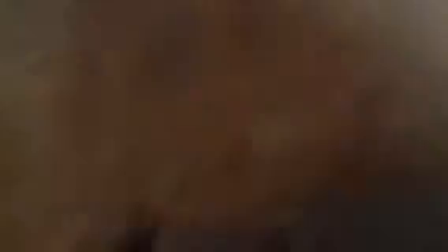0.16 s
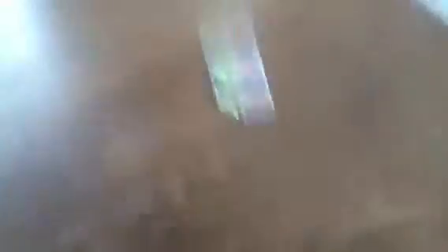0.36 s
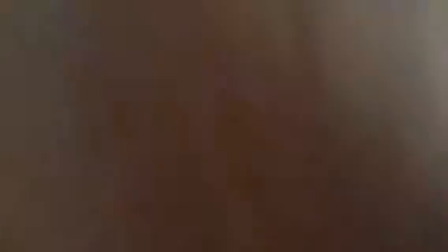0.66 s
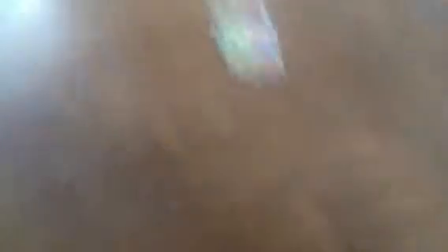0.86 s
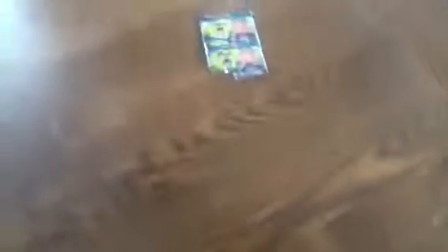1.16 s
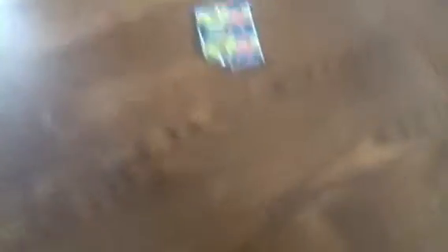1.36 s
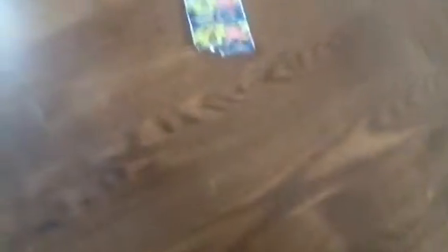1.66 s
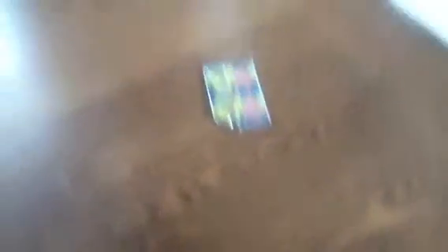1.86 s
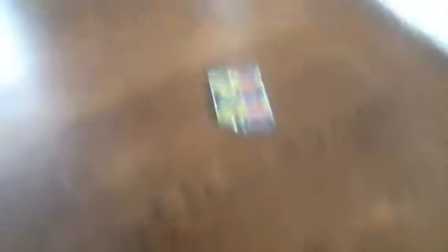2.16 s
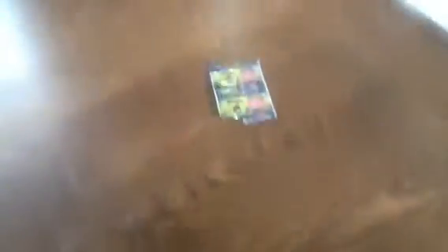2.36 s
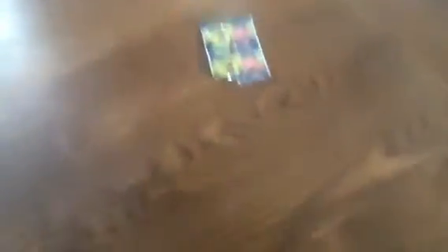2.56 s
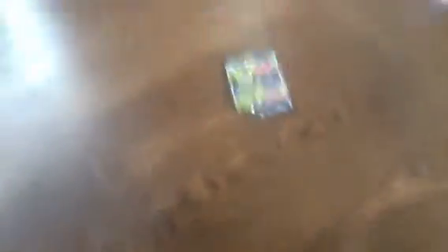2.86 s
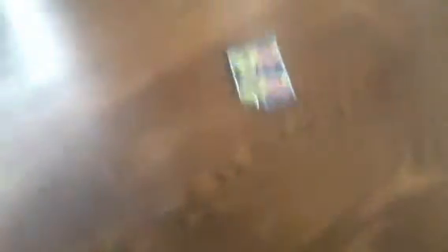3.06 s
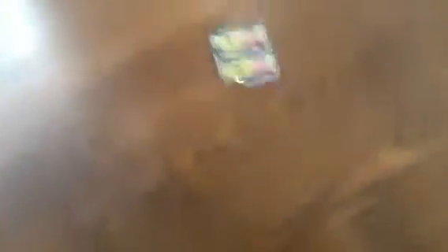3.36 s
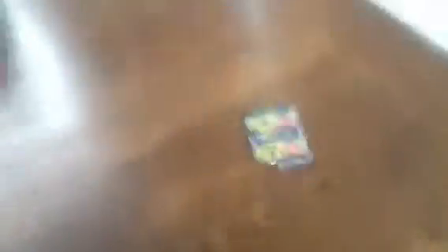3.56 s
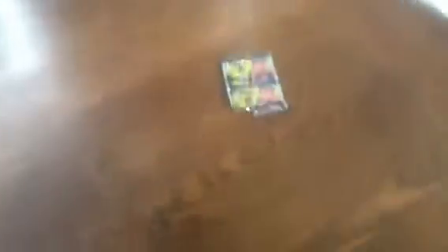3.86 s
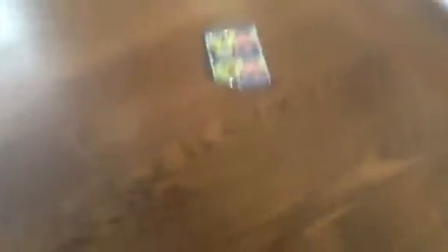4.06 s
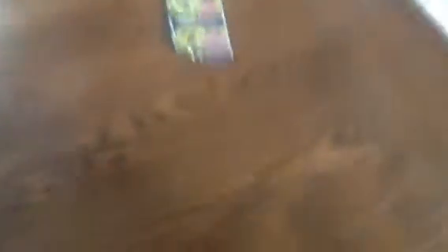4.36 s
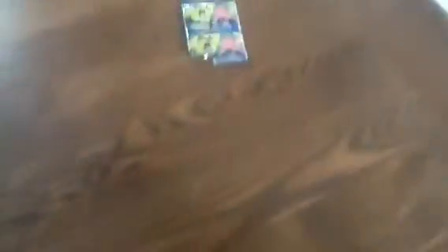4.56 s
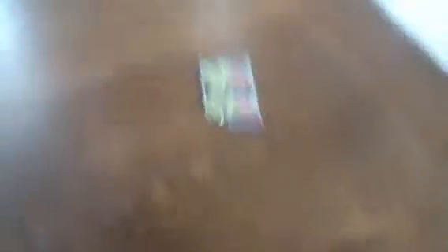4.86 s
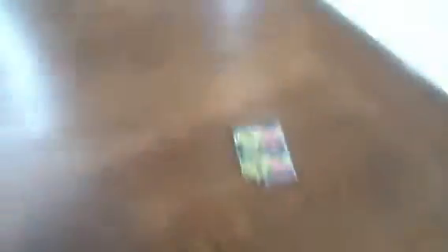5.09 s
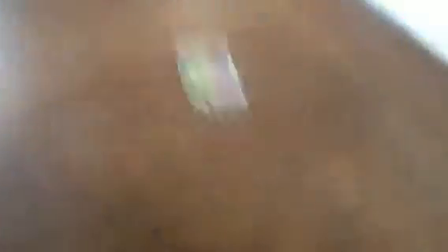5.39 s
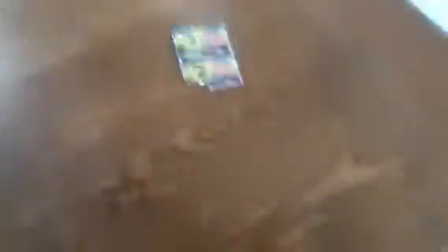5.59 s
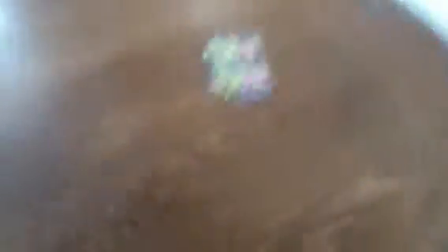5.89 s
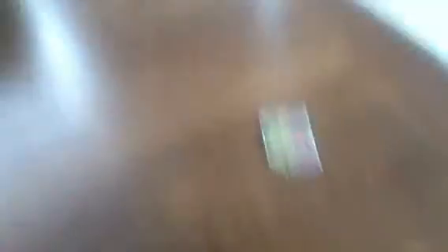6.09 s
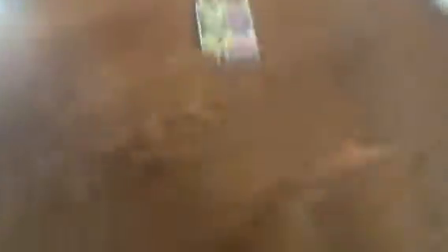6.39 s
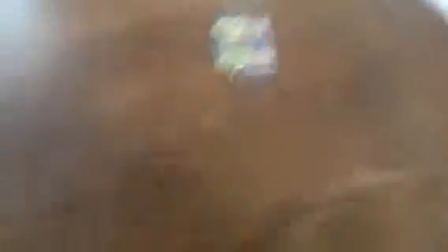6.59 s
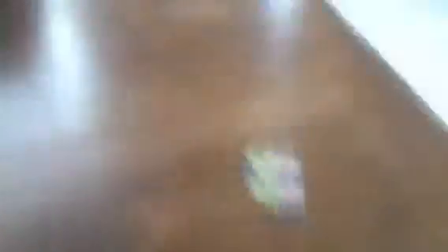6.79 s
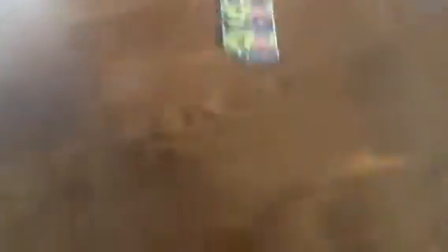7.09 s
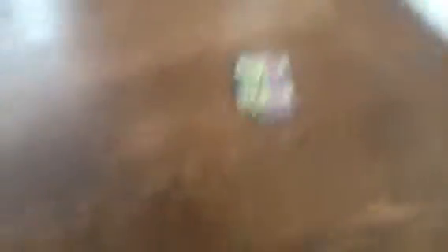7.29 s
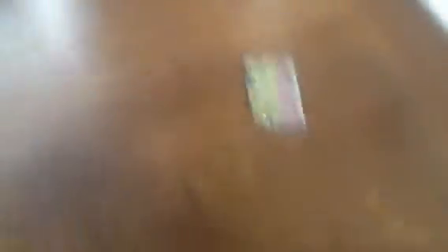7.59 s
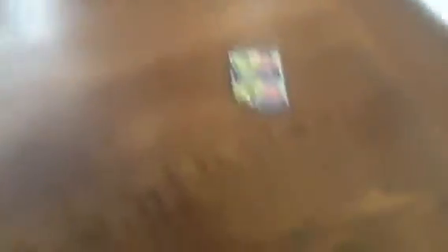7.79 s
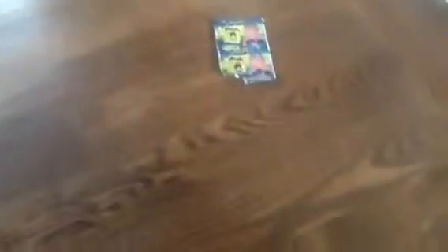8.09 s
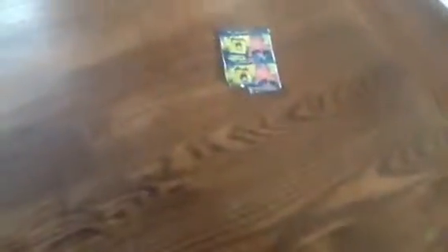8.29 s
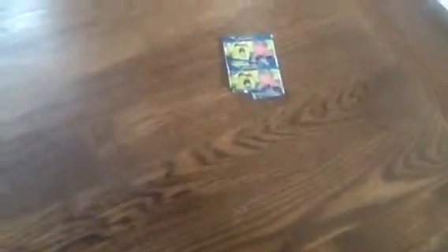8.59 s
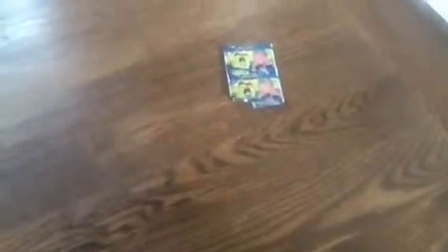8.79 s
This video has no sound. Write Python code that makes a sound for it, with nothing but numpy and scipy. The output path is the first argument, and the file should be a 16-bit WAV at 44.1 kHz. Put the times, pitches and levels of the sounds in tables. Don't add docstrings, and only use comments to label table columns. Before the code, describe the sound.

Fingers and palm work on a camera's plastic casing, heard right at its built-in microphone. Loud clustered knocks and gritty rubbing fill the first second, then irregular thumps, snaps and ticks come in bursts with quieter gaps. A heavy thud lands just after six seconds and a dense flurry near seven, then only faint ticks and soft rubbing over thin hiss. Dry, close, no room sound.

```python
import sys
import numpy as np
from scipy import signal
from scipy.fft import rfft, irfft
from scipy.io import wavfile

SR = 44100
rng = np.random.default_rng(int(sys.argv[2]) if len(sys.argv) > 2 else 0)


def master_out(mix):
    frames = np.transpose(np.atleast_2d(mix))
    ceiling = np.clip(frames, -1, 1)
    pcm = np.round(ceiling * 32767).astype(np.int16)
    wavfile.write(sys.argv[1], SR, pcm)


def convert_level_to_amplitude(level_db):
    exponent = np.asarray(level_db, float) / 20
    return 10 ** exponent


N = 394254

# freq_hz, density_db
HISS_SPECTRUM = [(100, 2), (800, -0.5), (2000, 1.2), (4000, 0), (9000, -0.8), (14400, -1.5)]
# start_s, duck_db
DUCKS = [
    (0.0, -3),
    (.23, -5.5),
    (.99, -4.5),
    (2.753, -3),
    (4.476, -5.5),
    (6.146, -8),
]
# time_s, rumble_db, grit_re_rumble_db
GRIP = [(0.05, -50.5, -15), (.28, -68.5, -6.5), (.4, -53.5, -25.5), (.85, -48, -22.5), (1.24, -60, -18),
        (2.1, -59.5, -13.5), (2.8, -61, -12), (2.94, -77, 0), (3.18, -80.5, 8), (3.24, -62.5, -6),
        (3.58, -70, -13), (3.9, -56, -11), (4.65, -60, -20), (5.6, -58.5, -11.5), (6.5, -58, -17),
        (7.8, -60.5, -13.5), (8.28, -60.5, -19), (8.94, -57, -16)]
# peak_s, rumble_db, swell_s, grit_re_rumble_db
SWELLS = [(0.215, -34, 0.06, -5.5), (0.315, -39.5, .04, -6), (0.609, -36, 0.06, -7.5),
          (0.985, -27, 0.05, -2), (1.7, -44.5, 0.44, -16), (2.02, -43, .06, -20), (2.31, -32.5, .11, -8.5),
          (2.41, -38, 0.04, -14), (2.535, -28.5, 0.1038, -8), (2.75, -35, 0.01, -15), (2.855, -42, 0.1, -5),
          (3.008, -39.5, 0.0836, -2.5), (3.295, -42.5, .075, -11.5), (3.472, -36, 0.08, -11),
          (3.66, -43, .1, -13.5), (4.375, -32.5, 0.1326, -10.5), (4.775, -43.5, 0.12, -11),
          (5.03, -40, 0.12, -16), (5.28, -44, 0.15, -13.5), (5.52, -33, 0.12, -16.5), (5.8, -46.5, 0, -19),
          (5.98, -40.5, 0.11, -12.5), (6.14, -42, 0.04, -19), (6.21, -48.5, 0.13, -13),
          (6.38, -39.5, 0.1, -12.5), (6.862, -28, 0.0578, -3), (7.045, -42, 0.18, -15),
          (7.35, -48, 0.27, -16), (7.48, -38, 0.05, -16.5), (7.61, -41.5, 0.1, -16.5),
          (0.69, -50.5, .1, -9), (0.8, -55, .1, -14), (1.45, -55, 0.13, -12), (2.66, -38.5, 0.2, -11.5),
          (3.23, -52, 0.039, 1.5), (3.9, -53.5, .12, -6.5), (4.205, -54.5, 0.073, -1),
          (4.35, -48.5, .04, -2), (6.07, -55, 0.14, -5.5), (6.125, -53, 0.04, -2.5), (6.58, -54, .08, -12),
          (6.87, -37.5, 0.22, -16), (7.03, -50, 0.036, -3), (7.86, -52.5, 0.093, -6.5),
          (8.0, -66.5, 0.28, -1)]
# start_s, step_db, rise_ms
PUSHES = [(0.2332, -24.0, 0.08), (0.2335, -21, 0.018), (0.2364, -13.5, 0.16), (0.5127, -0.5, 0.031),
          (0.5174, -33, 0.025), (0.5299, 2.6, 0.092), (0.5646, -15.5, 0.061), (0.5949, -15, 0.066),
          (0.6003, -7, 0.011), (0.6078, -7.5, 0.035), (1.1878, -17.5, 0.012), (1.2698, -11.5, 0.023),
          (2.2693, -16.1, 0.08), (2.5161, -12, 0.21), (2.5427, -16.5, 0.015), (2.7215, -24.3, 0.025),
          (2.7525, -0.5, 0.049), (2.7631, -14, 0.045), (3.0136, -24, 0.11), (4.0393, -15.5, 0.011),
          (4.391, 1, 0.067), (5.1057, -14, 0.08), (5.5315, -14.9, 0.08), (5.6578, -8, 0.032),
          (5.711, -11.5, 0.022), (5.8068, -14.5, 0.038), (6.1455, -1, 0.045), (6.8535, -17, 0.041),
          (6.8571, -18.5, 0.08), (6.8575, -20, 0.012), (8.7193, -35.5, 0.097)]
# start_s, step_db, rise_ms
PULLS = [(0.1515, -4.5, 0.028), (0.2265, -19.4, 0.16), (0.2283, -9, 0.045), (0.2286, -8.5, 0.0069),
         (0.5124, -5, 0.039), (0.6204, -27.5, 0.13), (0.969, -7.5, 0.058), (0.9733, -8, 0.012),
         (0.9801, -5, 0.05), (0.9811, -17, 0.045), (0.9891, -5, 0.018), (0.9983, -26, 0.045),
         (1.0339, -4.5, 0.1), (1.6238, -12.5, 0.016), (1.7219, -3.5, 0.027), (1.7237, -21.5, 0.012),
         (2.3105, -8.5, 0.012), (2.5252, -16, 0.017), (2.738, -1.5, 0.035), (2.7431, -8.5, 0.068),
         (4.0417, -32, 0.069), (4.4028, -5.5, 0.066), (4.4953, -17, 0.12), (5.0507, -10, 0.076),
         (5.0823, -2.5, 0.11), (5.1165, -9.5, 0.032), (5.5048, -3.5, 0.14), (5.5433, -6.5, 0.055),
         (5.7124, -28, 0.023), (6.1424, -27.5, 0.08), (6.4122, -9, 0.022), (6.8578, -23, 0.13)]
# start_s, step_db, softness_ms
SQUEEZES = [(0.1103, -7, 1), (0.112, -19, 0.18), (0.2154, -9, 0.18), (0.2159, 5, 0.35), (0.2168, -4, 0.16),
            (0.2347, -7, 0.15), (0.2351, 6, 0.5), (0.2383, -13, 0.12), (0.5272, -10, 0.88),
            (0.5922, -2, 0.62), (0.6094, -9, 0.8), (0.6179, -12.9, 0.33), (0.6219, -6, 0.52),
            (0.8239, -7, 1), (0.9474, -6, 0.32), (0.9654, -6.0, 0.29), (0.9856, -2, 0.32),
            (0.9933, 0, 0.66), (1.0024, 3, 0.63), (2.03, -6, 1), (2.0349, 3, 0.81), (2.0393, -9, 1),
            (2.2978, -1.5, 0.73), (2.3128, -11.5, 0.28), (2.3191, -3.8, 0.56), (2.3305, 1, 0.93),
            (2.5283, -3, 0.51), (2.5544, -3.5, 0.43), (2.6913, -10, 0.87), (2.7348, -1, 0.9),
            (3.0167, -12, 1), (3.4539, -12, 0.85), (3.4622, -13.5, 0.29), (3.466, -12, 0.58),
            (3.4707, -10, 0.39), (3.4781, -18, 0.32), (3.4899, -14, 0.64), (4.0388, -25, 0.14),
            (4.3546, 1.5, 0.88), (4.374, -3, 0.84), (4.4179, -4, 0.68), (5.4664, -7, 1), (5.5053, -5, 0.43),
            (5.7106, -17, 0.19), (6.1449, -22, 0.15), (6.3926, -14, 0.57), (6.4126, -16, 0.53),
            (6.8407, -4.0, 0.52), (6.8473, 11, 0.96), (6.8611, -7.5, 0.13), (6.8649, -16, 0.15),
            (6.8702, 11.4, 0.95), (6.8735, -9, 0.22), (6.8877, -9, 0.22), (6.8989, -6.6, 0.6),
            (7.4882, -14.3, 0.45)]
# start_s, step_db, softness_ms
RELEASES = [(0.1123, -4, 0.6), (0.1511, -4, 0.48), (0.2196, -3, 1), (0.2227, 0, 0.5), (0.228, 3, 0.14),
            (0.2302, -10, 0.15), (0.4715, -3.5, 0.46), (0.5152, -15, 0.18), (0.5162, 8.3, 0.97),
            (0.6306, -0.2, 1), (0.8518, -15, 0.33), (0.9364, -8.5, 0.17), (0.9565, 1.0, 1),
            (0.9719, -14, 0.22), (0.9747, -5, 0.24), (1.1243, -17, 1), (1.6875, -19.5, 0.25),
            (2.344, -10, 0.34), (2.3476, -12, 0.36), (2.4841, -9, 1), (2.5002, -8.3, 0.6),
            (2.5206, -3.5, 0.33), (2.5372, -1, 0.78), (2.5433, -16, 0.15), (2.5465, -15, 0.19),
            (2.5611, -7, 0.3), (2.7528, 2, 0.83), (2.8475, -8, 0.74), (3.0025, -15, 0.29),
            (3.0078, -11, 0.63), (3.0387, -23, 0.25), (3.5005, -12, 0.97), (4.3469, -14, 0.39),
            (4.4758, -5, 0.71), (4.7849, -24, 0.12), (5.476, -7.5, 0.82), (5.5114, -1.6, 0.9),
            (5.5406, -2, 1), (5.9648, -12.5, 0.47), (5.9752, -19, 0.5), (6.1243, -13, 1),
            (6.3671, -10, 0.76), (6.8347, -10.5, 0.64), (6.8494, 7.5, 0.94), (6.8497, -8, 0.22),
            (6.8557, -1.5, 0.28), (6.862, -6.5, 0.2), (6.8659, -8.8, 0.17), (6.8674, 10, 1),
            (6.8694, -2, 0.15), (6.8698, -10.9, 0.12), (6.8747, -7.1, 0.13), (6.8811, -0.5, 0.42),
            (6.9077, -7, 0.84), (7.0348, -18, 0.45), (7.4602, -9, 0.88), (7.836, -14.5, 0.67)]
# start_s,
# step_db, rise_ms
THUDS_UP = [(3.0035, -27, 0.15), (3.0859, -31, 0.2), (3.5042, -19, 1.0), (4.289, -27, 0.84),
            (4.8023, -30.5, 0.55), (4.9452, -31.5, 1.0), (5.2311, -23, 0.47), (5.978, -20, 1),
            (6.6154, -37, 0.35), (6.7382, -33.7, 0.35), (6.7587, -28.5, 0.073), (7.5203, -29, 0.14),
            (8.466, -31.5, 1), (8.6083, -36, 0.98),
            (0.6058, -12, 0.8), (0.6272, -18.3, 1), (0.9829, -11, 0.22), (1.1877, -17, 0.3),
             (1.7225, -21, 0.04), (2.2554, -17, 1), (2.3016, -9, 0.2), (2.31, -19, 0.22),
             (2.6133, 4.5, 0.31), (2.6934, -18.6, 0.22), (2.7525, -20, 0.24), (3.0152, -22, 0.2),
             (3.47, -24, 0.96), (4.4247, 0, 0.59), (4.4753, 9.5, 0.64), (4.803, -24.5, 0.7),
             (5.5073, -22.6, 0.4), (5.656, -21, 0.63), (6.1228, -27, 0.2), (6.1468, -19.5, 0.22),
             (6.8543, -0.5, 0.84), (6.8583, -15, 0.4), (6.8636, -1.0, 1), (6.8716, -18, 0.26)]
# start_s, step_db, rise_ms
THUDS_DOWN = [(0.1129, -13, 0.16), (0.2105, -6.5, 1), (0.2178, -3, 0.23), (0.2197, -6, 0.75),
              (0.2269, 2.2, 0.63), (0.3202, -6, 0.44), (0.516, 6.5, 0.97), (0.5894, -4, 0.5),
              (0.5996, 6, 0.7), (0.9829, 1, 1), (0.993, -10, 0.22), (0.9958, -13, 0.22),
              (1.0154, -1.3, 0.42), (0.5868, -7, 1), (1.6235, -17, 0.56), (1.7218, -19, 0.25),
              (2.3082, -10, 0.18), (2.535, -13, 1), (2.5456, 8.5, 0.63), (2.6937, 3, 0.93),
              (2.7387, -2.5, 1), (2.742, -10, 0.7), (2.749, -6.5, 0.59), (2.7637, -0.7, 1),
              (2.8348, -15, 1), (2.8937, -26, 0.37), (3.4765, -28, 0.22), (3.4836, -15, 1),
              (4.4743, -18, 0.26), (5.6652, -7.5, 0.97), (6.1458, -5, 1), (6.4119, -26, 1),
              (6.5756, -11.7, 1), (7.4604, -6.2, 1), (7.49, -2.4, 1), (7.4932, -9, 1),
              (0.1842, -25, .15), (0.2954, -22, .6), (0.706, -21.5, 1.0), (1.9884, -26, 0.87),
          (2.4524, -24, 1.0), (3.8377, -25, 1.0), (4.2104, -33, 1.0), (4.5992, -31, .6), (5.169, -27.5, .8),
          (5.1783, -29, .8), (5.3915, -27.5, 0.63), (5.6087, -36.7, .2), (6.759, -29, 0.42),
          (7.028, -27, .2), (8.305, -44, .15), (8.527, -37, 0.41)]
# start_s, step_db
SNAPS_UP = [(0.9456, -23.5), (1.0295, -19), (1.18752, -19.5), (1.5339, -23), (1.6581, -23.5), (1.7512, -24),
            (2.4938, -18), (2.5032, -18), (2.5753, -27), (2.5954, -18), (2.6562, -19), (2.7038, -20.5),
            (2.7891, -18.5), (2.8344, -28), (2.8361, -22), (2.8433, -18), (2.8878, -20.5), (2.897, -26),
            (3.0389, -20), (3.2825, -24.5), (3.4938, -23), (4.3993, -18.5), (4.7835, -18.5),
            (5.0133, -19.5), (5.3339, -24.5), (6.1222, -19.5), (6.8257, -20), (6.8339, -13.5),
            (7.4525, -16.5), (7.5754, -23),
            (0.533, -33.4), (0.9375, -28), (1.0992, -29), (2.3199, -25), (2.7688, -39), (2.8397, -29.5),
             (2.8956, -32), (2.3176, -29), (2.5161, -21.5), (2.9559, -37.5), (4.347, -33.9),
             (4.3492, -34.0), (4.411, -35.0), (4.4196, -32), (5.0798, -31.5), (6.8574, -26.3)]
# start_s, step_db
SNAPS_DOWN = [(0.2174, -18), (0.2384, -17), (0.3177, -17), (0.3266, -25), (0.6368, -17), (0.6866, -22.5),
              (0.7026, -31.5), (1.009, -17.5), (1.071, -21.5), (1.1003, -27), (1.4, -27.5), (1.4424, -23),
              (1.467, -17), (1.808, -25), (2.129, -29), (2.257, -15.5), (2.286, -11), (2.301, -11.5),
              (2.358, -28.5), (2.5075, -15), (3.0861, -28.5), (4.3852, -24), (4.5727, -32), (5.5277, -17),
              (5.5887, -25), (7.3656, -19), (7.5707, -27), (7.6102, -18.5), (8.7714, -23.5),
              (0.472, -29), (0.59953, -7), (0.9934, -17), (4.1863, -38), (0.5114, -38.2), (0.5158, -7.5),
               (0.58932, -19), (0.5983, -31.8), (0.9589, -29.0), (0.9754, -23), (0.9827, -9),
               (1.0171, -32.4), (2.3451, -35.3), (2.5234, -33.1), (2.5274, -30.7), (2.5542, -27),
               (2.5822, -32.0), (2.6315, -37.5), (2.7554, -35), (2.8736, -35.7), (3.3263, -34.9),
               (4.0417, -36), (5.0324, -41), (6.4154, -34), (6.7592, -42)]
# start_s, step_db
TICKS = [(1.1128, -40), (2.4524, -36), (3.2246, -34), (1.7528, -30), (2.6433, -26), (2.7216, -31),
         (2.9681, -29), (3.0326, -32), (3.334, -30), (3.5954, -34), (3.8675, -28), (3.972, -29.5),
         (4.0717, -28), (4.1897, -31.5), (4.2244, -31.5), (4.264, -26), (4.559, -27.5), (4.8239, -34.5),
         (5.561, -28), (5.9745, -31), (5.9898, -27.5), (6.0287, -33.5), (6.1793, -30), (6.2069, -27),
         (6.7063, -27.5), (6.78, -32), (6.7969, -26), (6.806, -25.5), (7.0471, -32.5), (7.6197, -32)]
FAINT_TICKS = [0.8794, 1.5296, 1.6519, 1.6705, 1.6725, 2.6315, 2.8128, 2.8736, 2.8838, 2.9557, 3.3108,
               3.327, 3.3448, 3.4593, 3.9016, 4.0944, 4.198, 4.507, 4.88, 4.9948, 5.3106, 5.4707, 5.8478,
               6.3677, 6.391, 6.566, 7.0715, 7.0969, 7.5129]
FAINTEST_TICKS = [1.553, 1.5922, 2.345, 2.39, 2.555, 2.582, 2.8274, 2.8633, 2.9597, 3.0742, 3.5468, 5.033,
                  6.054, 6.216, 6.2484, 6.659, 6.7298, 6.7492, 6.933, 6.1919, 7.132, 7.1783, 7.3083, 7.4741,
                  7.8804, 8.473, 8.867]
# time_s, level_db
SCRAPE = [
    (.155, -71.5),
    (.2, -57),
    (.225, -58),
    (.24, -46),
    (.262, -58),
    (.285, -60),
    (.295, -70),
]
# start_s, level_db
SNICKS = [(0.2361, -22), (0.2385, -11), (0.242, -18), (0.2446, -21), (0.2522, -23), (0.2573, -22.5),
          (0.2678, -31), (0.2709, -30), (0.2749, -24), (2.988, -26), (4.1632, -40), (4.199, -36)]
# start_s, level_db
TAP = (2.988, -18.5)
# freq_hz, level_db, t60_s
CASING_MODES = [(287, -7.5, 0.066), (750, -5.5, 0.025), (1420, 2, 0.016), (2180, -7.5, 0.013),
                (2620, -12, 0.01), (3500, -9, 0.0088), (5300, -20, 0.005)]


def add(mix, start_s, sound):
    part = mix[round(start_s * SR):][:len(sound)]
    part += sound[:len(part)]


def smooth(x, time_ms):
    pole = np.exp(-1000 / (SR * max(time_ms, .003)))
    return signal.lfilter([1 - pole], [1, -pole], x)


def low_cut(x):
    coupling_hz, wind_hz = 110, 157
    coupling = signal.butter(1, coupling_hz, "high", fs=SR, output="sos")
    wind = signal.butter(4, wind_hz, "high", fs=SR, output="sos")
    return signal.sosfilt(np.vstack([coupling, wind]), x)


def limiter_db():
    recover_s = 0.49
    t = np.arange(N) / SR
    return sum(duck_db * (t >= s) * np.exp(-abs(t - s) / recover_s) for s, duck_db in DUCKS)


def hiss():
    level_db = -67.5
    hz = np.fft.rfftfreq(N, 1 / SR)
    curve_hz, curve_db = np.transpose(HISS_SPECTRUM)
    density_db = np.interp(np.log(hz + 1), np.log(curve_hz), curve_db)
    noise = irfft(rfft(rng.standard_normal(N)) * convert_level_to_amplitude(density_db), N)
    return noise / noise.std() * convert_level_to_amplitude(level_db + limiter_db())


def heard_rms(slope, lo_hz, hi_hz):
    band = signal.butter(2, [lo_hz, hi_hz], "band", fs=SR, output="sos")
    return np.std(signal.sosfilt(band, low_cut(np.cumsum(slope))))


def grains(per_s, spread_db, rise_ms):
    when, sign, size = rng.random((N, 3)).T
    size_db = spread_db * np.minimum(-np.log(size + 1e-9), 4)
    impulses = (when < per_s / SR) * np.sign(sign - .5) * convert_level_to_amplitude(size_db)
    return smooth(impulses, rise_ms)


def effort():
    swell_db, fade_slower, grit_steeper, roundness, crest_db = 22.5, 1.13, 1.175, 1.24, -1.7
    t = np.arange(0, N, 64) / SR
    s, hold_db, hold_grit_db = np.transpose(GRIP)
    peak_s, top_db, swell_s, grit_db = np.transpose(SWELLS)[:, :, None]
    away_s = np.maximum(peak_s - t, (t - peak_s) / fade_slower)
    under_db = swell_db * (away_s / swell_s) ** roundness - crest_db
    rumble_power = convert_level_to_amplitude(2 * np.interp(t, s, hold_db))
    rumble_power = rumble_power + convert_level_to_amplitude(2 * (top_db - under_db)).sum(0)
    grit_power = convert_level_to_amplitude(2 * np.interp(t, s, hold_db + hold_grit_db))
    grit_power = grit_power + convert_level_to_amplitude(2 * (top_db + grit_db - grit_steeper * under_db)).sum(0)
    return [np.interp(np.arange(N) / SR, t, 10 * np.log10(p)) for p in (rumble_power, grit_power)]


def rubbing():
    rumble_db, grit_db = effort()
    flutter = smooth(smooth(rng.standard_normal(N), 6), 6)
    flutter /= flutter.std()
    rumble_db = rumble_db + 1.5 * flutter
    grit_db = grit_db + 2.54 * flutter + .4 * limiter_db()
    rumble = smooth(smooth(grains(900, 2.4, 2.1), 0.75), 0.4)
    grit = grains(4000, 4.0, 0.21)
    fizz = grains(4000, 4.0, 0.01)
    crackle = grains(160, 3.0, 0.05)
    rumble *= convert_level_to_amplitude(rumble_db + 0.6) / heard_rms(rumble, 80, 450)
    grit *= convert_level_to_amplitude(grit_db - 3.0) / heard_rms(grit, 700, 3000)
    fizz *= convert_level_to_amplitude(1.05 * (grit_db + 40.0) - 61.5) / heard_rms(fizz, 4800, 12000)
    crackle *= convert_level_to_amplitude(grit_db - 10) / heard_rms(crackle, 700, 3000)
    return rumble + grit + fizz + crackle


def slips():
    shiver_db, shiver_ms = -32, 1.9
    snap_rise_ms, tick_rise_ms, faint_db, faintest_db = 0.028, 0.027, -38, -42
    ramp_share, ramp_max_ms = 0.82, 0.063
    slope, ms = np.zeros(N), 1000 * np.arange(600) / SR
    up = PUSHES + THUDS_UP
    up = up + [(s, db, snap_rise_ms) for s, db in SNAPS_UP]
    up += [(s, db, tick_rise_ms) for s, db in TICKS]
    up += [(s, faintest_db, tick_rise_ms) for s in FAINTEST_TICKS]
    down = PULLS + THUDS_DOWN
    down = down + [(s, db, snap_rise_ms) for s, db in SNAPS_DOWN]
    down += [(s, faint_db, tick_rise_ms) for s in FAINT_TICKS]
    kinds = (up, 1, 0), (down, -1, 0), (SQUEEZES, 1, 2), (RELEASES, -1, 2)
    for table, sign, round_start in kinds:
        for start_s, step_db, rise_ms in table:
            noise = rng.standard_normal(len(ms))
            rise = ms ** round_start * np.exp(-ms / max(rise_ms, .004))
            ramp_ms = ramp_share * min(rise_ms, ramp_max_ms) * np.exp(.3 * noise[0])
            rise = rise * np.minimum((ms + ms[1]) / max(ramp_ms, ms[1]), 1) ** 2
            sharp = 1 / (1 + (rise_ms / 0.18) ** 2)
            shiver = smooth(noise ** 3 / 4, 0.035) * np.exp(-ms / shiver_ms) * (ms > .2)
            shiver *= convert_level_to_amplitude(shiver_db) * sharp
            add(slope, start_s, convert_level_to_amplitude(step_db) * (sign * rise / rise.sum() + shiver))
    return slope


def scrape():
    level_db = np.interp(np.arange(N) / SR, *np.transpose(SCRAPE), -120, -120)
    grain = np.diff(grains(9000, 2.5, 0.034), prepend=0)
    return convert_level_to_amplitude(level_db) * grain / grain.std()


def snicks():
    decay_ms = 0.07
    slope, ms = np.zeros(N), 1000 * np.arange(600) / SR
    for start_s, level_db in SNICKS:
        snick = rng.standard_normal(len(ms)) * np.exp(-ms / decay_ms)
        add(slope, start_s, convert_level_to_amplitude(level_db) * np.diff(snick, prepend=0) / np.linalg.norm(snick))
    return slope


def tap():
    contact_s, onset_s = 0.0005, 0.00032
    out, t = np.zeros(N), np.arange(3000) / SR
    ring = np.zeros(len(t))
    for hz, db, t60_s in CASING_MODES:
        ring -= convert_level_to_amplitude(db - 60 * t / t60_s) * np.cos(2 * np.pi * hz * (t - contact_s))
    onset = np.sin(np.pi / 2 * np.minimum(t / onset_s, 1)) ** 2
    start_s, level_db = TAP
    add(out, start_s, convert_level_to_amplitude(level_db) * ring * onset)
    return out


def scene():
    pressure = np.cumsum(slips() + snicks() + rubbing())
    pressure = smooth(smooth(pressure, 0.0098), 0.007)
    return (pressure + tap() + hiss() + scrape())[None]


def band_limit(x):
    return signal.sosfilt(signal.butter(12, 16530, fs=SR, output="sos"), x)


def record(dry):
    leak_db, ceiling, edge_hz, shelf_db = -43.0, .7, 15250, -32.5
    deep = signal.sosfilt(signal.butter(2, [42, 110], "band", fs=SR, output="sos"), dry)
    x = np.clip(low_cut(dry) + convert_level_to_amplitude(leak_db) * deep, -ceiling, ceiling)
    low_pass = signal.firwin(511, edge_hz, window=("kaiser", 6), fs=SR)
    dull = signal.oaconvolve(x, low_pass[None], "same")
    return band_limit(dull + convert_level_to_amplitude(shelf_db) * (x - dull))


dry = scene()
out = record(dry)
master_out(out)
```